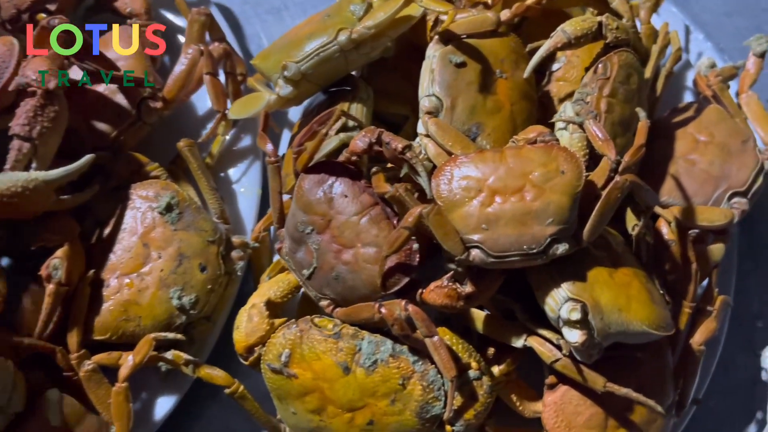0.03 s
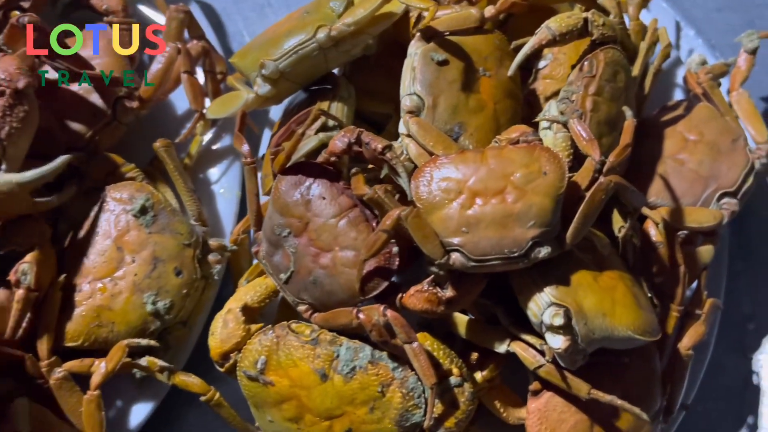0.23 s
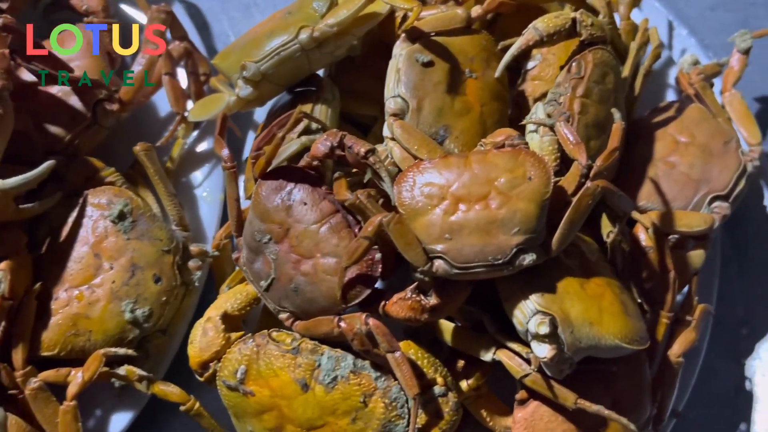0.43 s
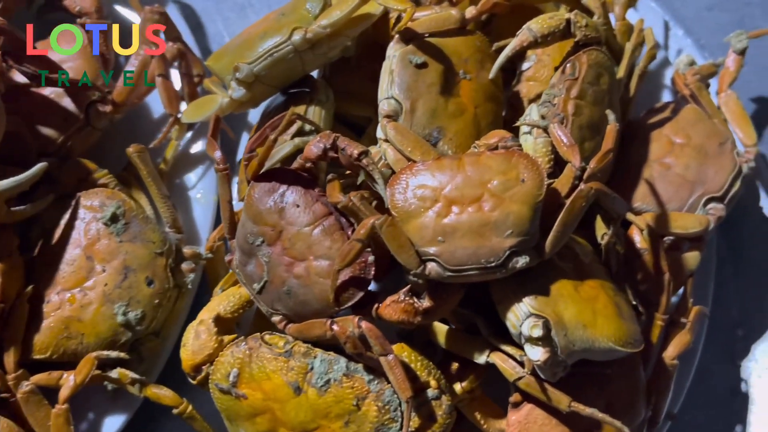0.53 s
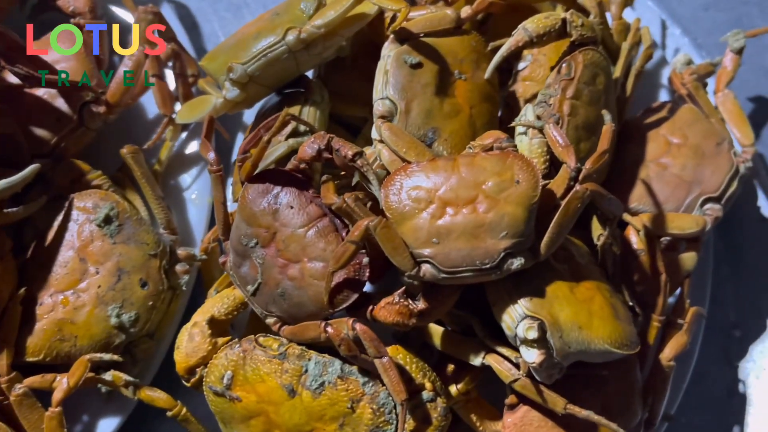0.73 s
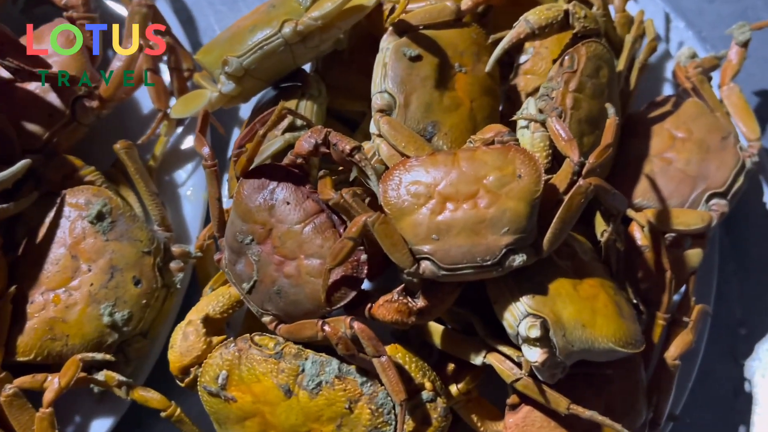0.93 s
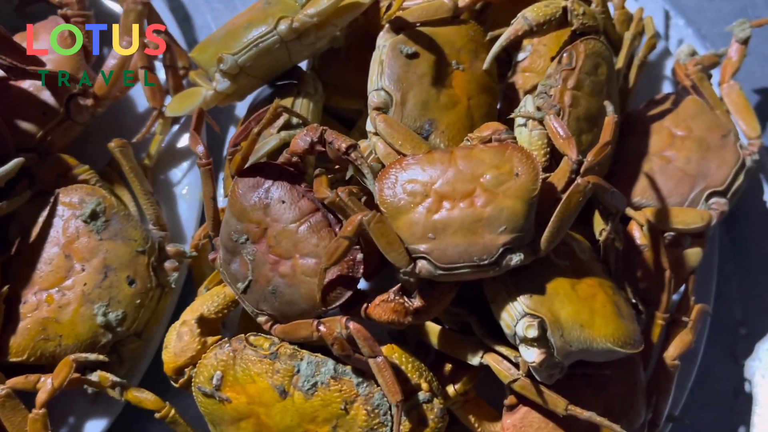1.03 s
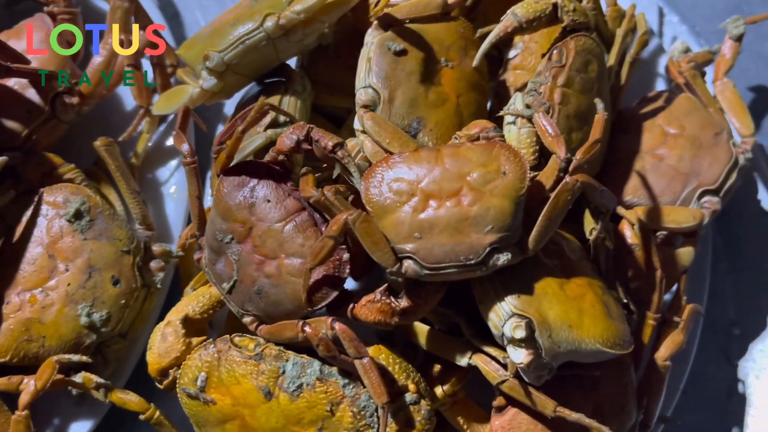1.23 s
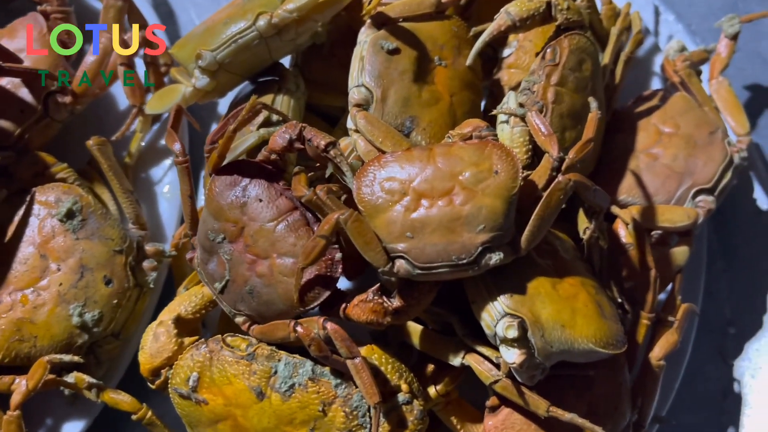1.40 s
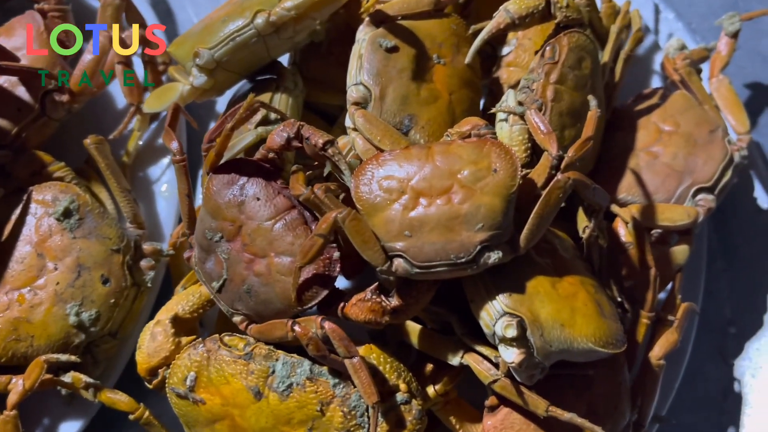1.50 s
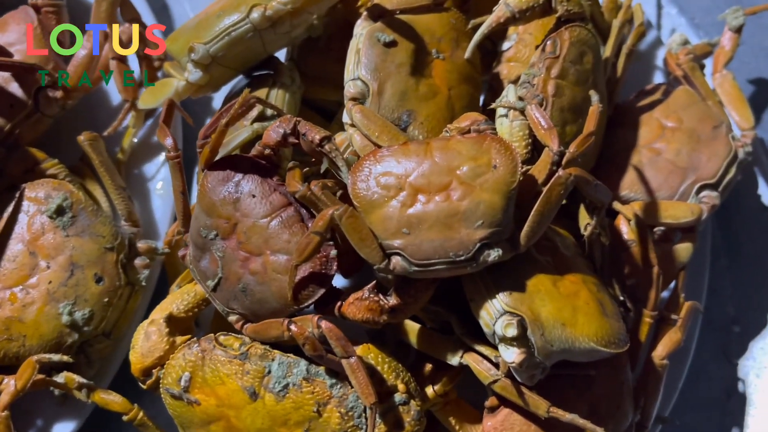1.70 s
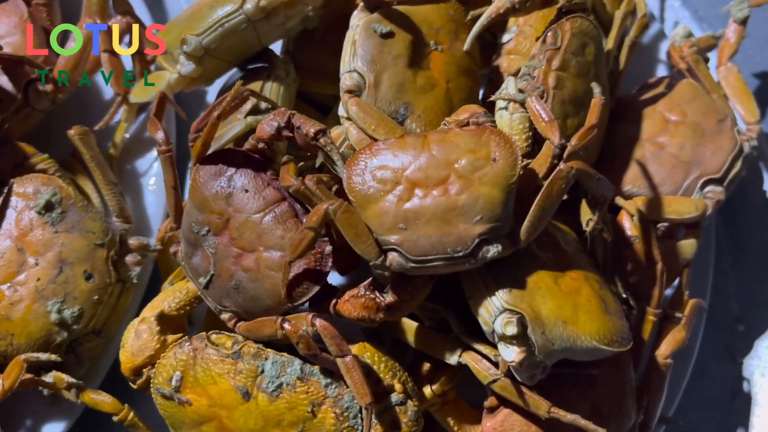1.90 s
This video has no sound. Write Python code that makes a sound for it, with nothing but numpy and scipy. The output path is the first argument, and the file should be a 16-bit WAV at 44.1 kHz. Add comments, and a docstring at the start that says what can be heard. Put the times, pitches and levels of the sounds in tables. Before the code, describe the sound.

One sharp click of crab shells in a tub, with faint scraping and low microphone rumble.

```python
"""A crab shell knocks on others in a plastic tub outdoors, close to the microphone, and chatters to rest
in about 40 ms; each contact rings shell, rim and tub. Legs and shells scrape faintly in short rubs.
Breeze and handling make the hand-held microphone rumble and bump, mostly in the first second.
Behind the tub an insect chirps with pulsing wings, over far insects and a thin, steady hiss."""
import sys
import numpy as np
from scipy import signal
from scipy.fft import rfft, irfft
from scipy.io import wavfile
from scipy.ndimage import uniform_filter1d

SR = 44100
rng = np.random.default_rng(int(sys.argv[2]) if len(sys.argv) > 2 else 0)


def wrap_up_sound(samples):
    """Save the sound to the file named by the first command line argument, as 16-bit audio."""
    columns = np.atleast_2d(samples).T
    # keep every value between -1 and 1, then stretch to whole-number steps
    tamed = np.clip(columns, -1, 1)
    steps = np.round(tamed * 32767).astype(np.int16)
    wavfile.write(sys.argv[1], SR, steps)


N = 85995


def undb(db):
    """Decibels to gain."""
    return 10 ** (np.asarray(db) / 20)


def unit(x):
    """Scale to rms 1."""
    return x / np.sqrt(np.mean(x ** 2))


def colour(x, points):
    """Filter by a curve through (Hz, dB) points."""
    hz, db = np.array(points, float).T
    f = np.maximum(np.fft.rfftfreq(N, 1 / SR), 1)
    return irfft(rfft(x) * undb(np.interp(np.log(f), np.log(hz), db)), N)


def noise(points):
    """Coloured noise of rms 1."""
    return unit(colour(rng.standard_normal(N), points))


def band(hz, width):
    """A narrow band of noise of rms 1."""
    f = np.fft.rfftfreq(N, 1 / SR)
    return unit(irfft(rfft(rng.standard_normal(N)) / (1 + ((f - hz) / (width / 2)) ** 2), N))


def waver(rate_hz):
    """A smooth random drift of rms 1."""
    hold = max(int(SR / rate_hz), 1)
    steps = np.repeat(rng.standard_normal(N // hold + 1), hold)
    return unit(uniform_filter1d(steps, hold)[:N])


def since(start):
    """Seconds since a moment, zero before it."""
    return np.maximum(np.arange(N) / SR - start, 0)


def spread(x):
    """Opposite polarity in the two channels."""
    return np.array([x, -x])


# The microphone's two ports. Each row: frequency in Hz, left minus right in dB, left's lead in radians.
PORT_RESPONSE = [(200, 0, 0), (550, 3, .8), (850, 5, 1.2), (1050, 3, .8), (1250, 4, -1.9), (1600, 3, -.6),
                 (2200, 1, -.1), (3000, 2, 1.3), (3500, 3, .6), (5400, 4, 1), (6700, 4, .3), (7600, 2, .8),
                 (8700, 0, -.1), (10200, 0, -3.1), (11700, 0, -6), (12500, 0, -6.3)]
def at_ports(x):
    """Sound reaches the two ports with level and phase differences that change with frequency."""
    hz, db, lead = np.array(PORT_RESPONSE, float).T
    f = np.fft.rfftfreq(N, 1 / SR)
    gain = undb(np.interp(f, hz, db) / 2)
    lag = np.exp(-1j * np.interp(f, hz, lead))
    return irfft(rfft(x) * np.array([gain, lag / gain]), N)


# Open air all around: the hiss both ports share, then the part that differs between them.
# Each row: frequency in Hz, relative noise density in dB.
AIR_SPECTRUM = [(30, -12.5), (190, 4.5), (330, 0), (550, -2.5), (1000, -7.5), (2200, -9), (3900, -11),
                (5400, -14.5), (8000, -9), (9600, -12.5), (11000, -9), (12100, -15), (12800, -49),
                (16000, -33)]
AIR_SIDE_SPECTRUM = [(100, -11), (550, -9), (2200, -10.5), (5000, -17.5), (9000, -22), (12000, 1),
                     (14000, -48)]
def air(level_db=-56, side_db=-3.5, waver_db=.5):
    """Faint outdoor hiss that wavers a little."""
    hiss = at_ports(noise(AIR_SPECTRUM)) + undb(side_db) * spread(noise(AIR_SIDE_SPECTRUM))
    return hiss * undb(level_db + waver_db * waver(rate_hz=11.57))


# Breeze and hand, right on the microphone. Each row: time in seconds, level in dB.
RUMBLE_LEVELS = [(0, -41), (.13, -38), (.19, -53), (0.238, -36), (.33, -35), (.40, -33.5), (.45, -48),
                 (0.499, -35.5), (.58, -34), (.74, -33.5), (0.798, -26), (0.839, -56), (.90, -43.5),
                 (.97, -56.5), (1.12, -44), (1.26, -58.5), (1.74, -76), (1.85, -54.5), (1.95, -57)]
# The rumble's deep tone. Each row: frequency in Hz, relative noise density in dB.
RUMBLE_SPECTRUM = [(20, -32), (32, -14), (45, -3), (62, 0), (95, -4), (130, -15), (200, -28), (300, -42),
                   (600, -58), (2000, -80)]
def rumble(side_db=-11.5):
    """Low rumble of breeze and handling, nearly the same at both ports."""
    low = noise(RUMBLE_SPECTRUM)
    steady = low / np.sqrt(uniform_filter1d(low ** 2, size=3000))  # even out the noise's own swells
    level = undb(np.interp(np.arange(N) / SR, *np.array(RUMBLE_LEVELS).T))
    return level * (steady + undb(side_db) * spread(noise(RUMBLE_SPECTRUM)))


# The hand on the microphone housing. Each row: start in seconds, starting pitch in Hz, peak level in dB.
HANDLING_BUMPS = [(0.046, 211, -25), (0.086, 198, -37.5), (0.26, 260, -32), (0.301, 242, -26.5),
                  (0.342, 211, -21.5), (0.554, 176, -23), (0.627, 213, -29), (0.663, 478, -30),
                  (0.704, 300, -29), (0.762, 393, -19), (0.851, 332, -39.5), (0.885, 370, -38),
                  (0.998, 237, -42.5), (1.109, 290, -39), (1.194, 350, -39)]
def bumps(end_hz=56.1, fall_s=.0091, peak_s=.02, sharpness=5.2):
    """Soft bumps on the housing swell and die while their pitch falls."""
    out = 0
    for start, hz, db in HANDLING_BUMPS:
        age = since(start)
        cycles = end_hz * age + (hz - end_hz) * fall_s * (1 - np.exp(-age / fall_s))
        swell = (age / peak_s * np.exp(1 - age / peak_s)) ** sharpness
        out = out + undb(db) * swell * np.sin(2 * np.pi * cycles)
    return out


# Legs and shells rubbing in the tub, close by. Each row: start and length in seconds, resonance in Hz,
# then the levels of resonance, gritty middle and bright edge in dB.
RUBS = [(0.103, 0.016, 2270, -57, -51, -49.5), (0.127, .025, 4850, -55, -73, -51.5),
        (0.183, 0.021, 640, -55.5, -67, -69), (0.213, 0.023, 4500, -74, -61, -49.5),
        (0.302, 0.028, 2390, -63, -52, -48.5), (0.355, 0.033, 1060, -51.5, -56, -61),
        (0.401, .04, 2030, -56.5, -64, -66), (0.459, 0.037, 926, -56.5, -85, -80),
        (0.546, .03, 4600, -55, -55, -45.5), (0.592, 0.038, 4600, -72, -59.5, -52),
        (0.723, 0.02, 4720, -57, -51.5, -54), (0.777, 0.017, 1840, -57, -81, -53),
        (0.809, 0.026, 1190, -54, -84, -65), (0.947, 0.0089, 3100, -54.5, -54, -68),
        (1.003, 0.008, 4400, -72, -61, -51), (1.033, 0.052, 3050, -63, -56.5, -60.5),
        (1.123, 0.029, 3170, -57.5, -55.5, -66), (1.156, 0.11, 1530, -59, -63.5, -76),
        (1.19, 0.017, 3070, -55.5, -71, -52.5), (1.202, 0.036, 2120, -60, -59, -61.5),
        (1.225, 0.051, 1780, -61, -75, -64), (1.276, 0.031, 5230, -54.5, -62, -50),
        (1.304, 0.0069, 2490, -48, -55.5, -59), (1.519, 0.016, 610, -52.5, -76, -78),
        (1.594, 0.097, 585, -57, -67.5, -83), (1.641, 0.083, 1580, -60, -59.5, -77),
        (1.661, 0.018, 2970, -50.5, -62, -54.5), (1.693, 0.024, 457, -52, -75, -66),
        (1.757, 0.026, 3530, -50, -51, -49), (1.826, 0.019, 2340, -60.5, -68, -52),
        (1.844, 0.018, 1890, -61.5, -49.5, -50)]
# The tone of the grit and of the edge. Each row: frequency in Hz, relative noise density in dB.
GRIT_SPECTRUM = [(300, -35), (900, -8), (1800, 9.5), (3500, 6.5), (5000, 5.5), (8000, -4.5)]
EDGE_SPECTRUM = [(1000, -42), (3500, -11), (6000, -7.5), (8500, 0.5), (11500, 6.5), (13000, -8.5)]
def scrapes(rise_s=.002, grain_db=2.5):
    """Short, grainy rubs of shell on shell; each excites the resonance of one leg or shell."""
    grit, edge = noise(GRIT_SPECTRUM), noise(EDGE_SPECTRUM)
    grain = unit(undb(grain_db * waver(rate_hz=450)))
    out = 0
    for start, length, hz, ring_db, grit_db, edge_db in RUBS:
        age = since(start)
        envelope = np.minimum(age / rise_s, 1) * np.exp(-(age / length) ** 2)
        resonance = undb(ring_db) * band(hz, width=350 + hz / 7.4)
        out = out + envelope * grain * (resonance + undb(grit_db) * grit + undb(edge_db) * edge)
    return at_ports(out)


# One insect behind the tub. Each row: start in seconds, length in seconds, level in dB.
INSECT_CHIRPS = [(0.115, 0.21, -61), (0.436, 0.22, -59), (0.77, 0.22, -61), (1.151, 0.24, -61.5),
                 (1.51, 0.22, -60.5), (1.845, .22, -62)]
# More insects, far from the microphone. Each row: centre in Hz, bandwidth in Hz, level in dB.
FAR_INSECTS = [(4486, 460, -63.5), (6375, 300, -69)]
def insects(pulse_hz=116.4, pulse_depth=.5, ramp_s=.033, waver_db=1):
    """One insect chirps in trains of wing pulses; others hiss steadily far off."""
    t = np.arange(N) / SR
    chirps = sum(undb(db) * np.clip(np.minimum(t - start, start + length - t) / ramp_s, 0, 1)
                 for start, length, db in INSECT_CHIRPS)
    pulses = unit(1 + pulse_depth * np.sin(2 * np.pi * pulse_hz * t))
    far = sum(undb(db) * band(hz, width) * undb(waver_db * waver(rate_hz=6.26))
              for hz, width, db in FAR_INSECTS)
    return at_ports(chirps * pulses * band(hz=6916, width=210) + far)


def decay(age, t60, contact_s=.0002):
    """Quick rise of a contact, then a free fall of 60 dB in t60 seconds."""
    return (1 - np.exp(-age / contact_s)) * np.exp(-np.log(1000) * age / t60)


def ring(age, modes, ratio=1):
    """Damped modes, the k-th scaled by ratio ** k; a negative ratio swings neighbours in opposition."""
    return sum(ratio ** k * undb(db) * np.sin(2 * np.pi * hz * age) * decay(age, t60)
               for k, (hz, db, t60) in enumerate(modes))


# The shell landing on the heap, close by. Each row: start in seconds, then shell, rim and tub gains in dB.
KNOCK_CONTACTS = [(0.2402, -42, -20.5, -44), (0.2526, -10, -13.5, -27), (0.2544, -33, -29, -51),
                  (0.2612, -54, -45, -46), (0.2682, -36, -26, -31.5), (0.2737, -31, -36, -51),
                  (0.2790, -31, -18, -35), (0.2808, -35, -31, -34.5)]
# Modes of the shell's body, its hard rim and the plastic tub.
# Each row: frequency in Hz, relative level in dB, seconds to fall by 60 dB.
SHELL_MODES = [(1640, -22, 0.0042), (2360, -4, 0.003), (3820, -9, 0.0058), (5680, -2, 0.0017),
               (6340, -13, .005)]
RIM_MODES = [(8110, 1, 0.0027), (8910, -6.5, 0.0018), (10350, -10.5, 0.009), (11200, -0.5, 0.0024)]
TUB_MODES = [(510, -9, .03), (590, -3, .032), (712, 0, .03), (835, 0, .032), (935, -6, .032),
             (1243, -13, .045), (1600, -15, .04), (1932, -12, .045), (2045, -14, .045)]
# Sound scattered among the shells. Each row: frequency in Hz, relative noise density in dB.
HEAP_SPECTRUM = [(150, -35), (400, -14), (700, 3), (1200, -5), (2100, 1), (3100, -12), (3900, -4),
                 (5200, -10), (8000, -3), (12000, -7)]
def knock(crack_db=-8, scatter_db=-25, rim_weight_db=.5):
    """Each contact cracks, rings shell, rim and tub, and scatters through the heap."""
    out = 0
    for start, shell_db, rim_db, tub_db in KNOCK_CONTACTS:
        age = since(start)
        crack = undb(crack_db) * rng.standard_normal(N) * decay(age, t60=.005)
        shell = undb(shell_db) * ring(age, SHELL_MODES)
        rim = undb(rim_db) * (ring(age, RIM_MODES) + crack)
        tub = undb(tub_db) * ring(age, TUB_MODES, ratio=-.95)
        blow = np.hypot(undb(shell_db), undb(rim_db + rim_weight_db))
        scatter = blow * undb(scatter_db) * noise(HEAP_SPECTRUM) * decay(age, t60=.055)
        out = out + shell + rim + tub + scatter
    return at_ports(out)


def scene():
    """The tub of crabs in the open air, heard from a microphone held beside it."""
    return knock() + scrapes() + rumble() + bumps() + insects() + air()


# The hand-held microphone's response. Each row: frequency in Hz, gain in dB.
MIC_RESPONSE = [(20, -0.5), (11000, 2), (11800, -0.5), (12500, -12), (13500, -25), (16000, -31)]
def record(dry, top_hz=15800):
    """The microphone dulls the highest treble and cuts off steeply at the top."""
    lowpass = signal.ellip(8, .2, 70, top_hz, fs=SR, output="sos")
    return signal.sosfilt(lowpass, colour(dry, MIC_RESPONSE))


dry = scene()
out = record(dry)
wrap_up_sound(out)
```